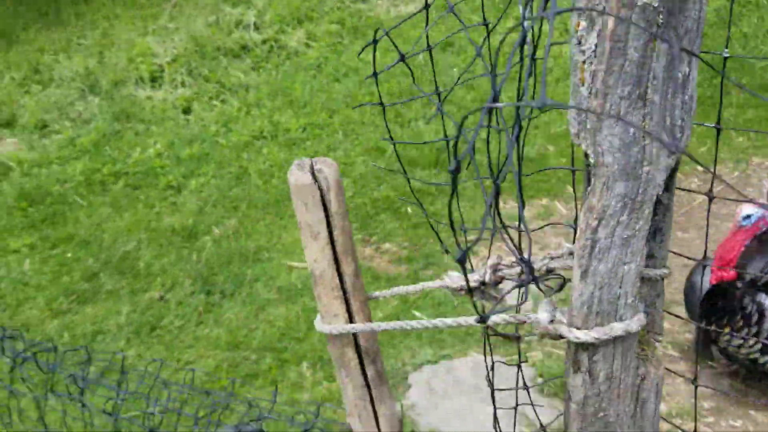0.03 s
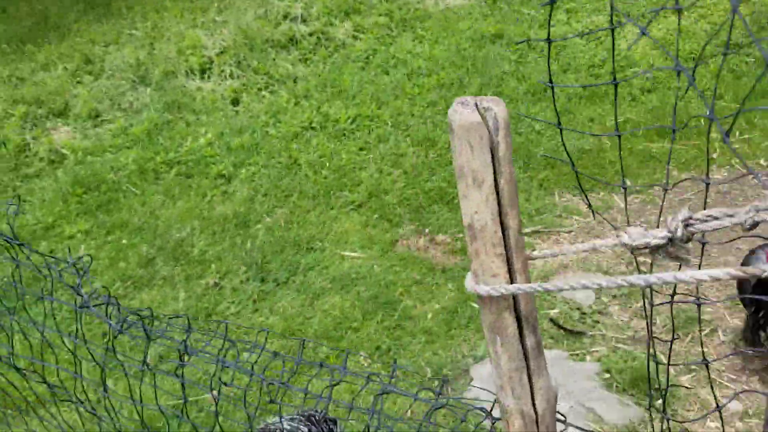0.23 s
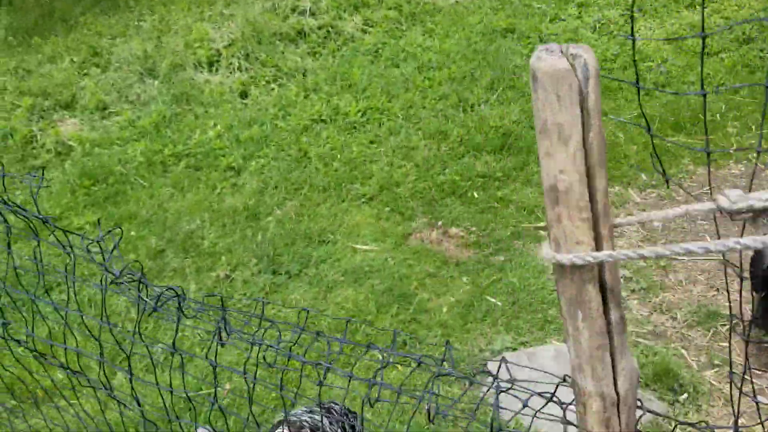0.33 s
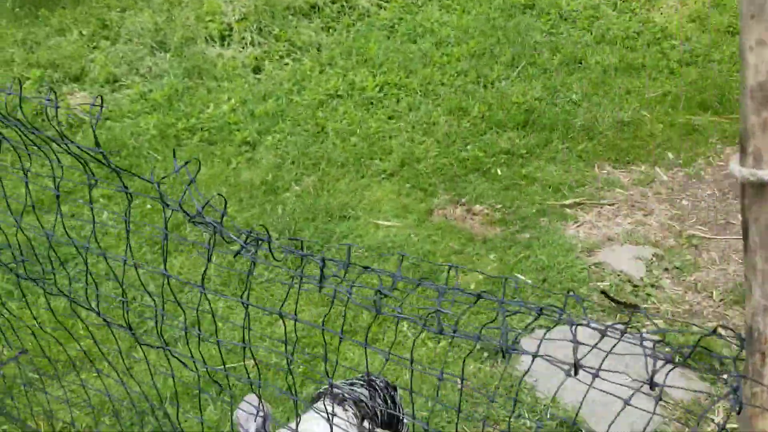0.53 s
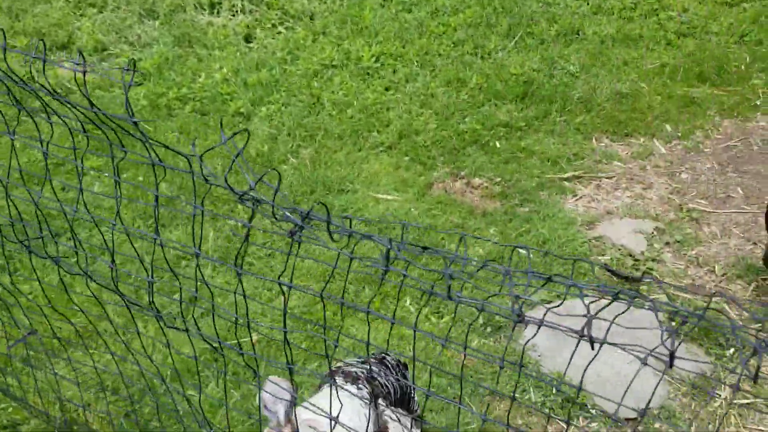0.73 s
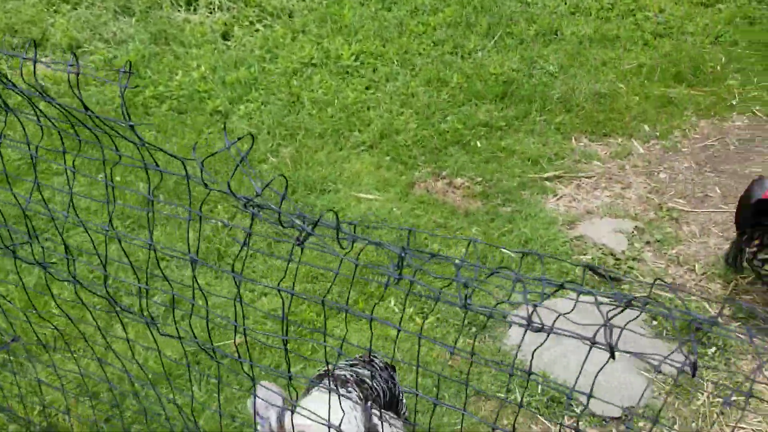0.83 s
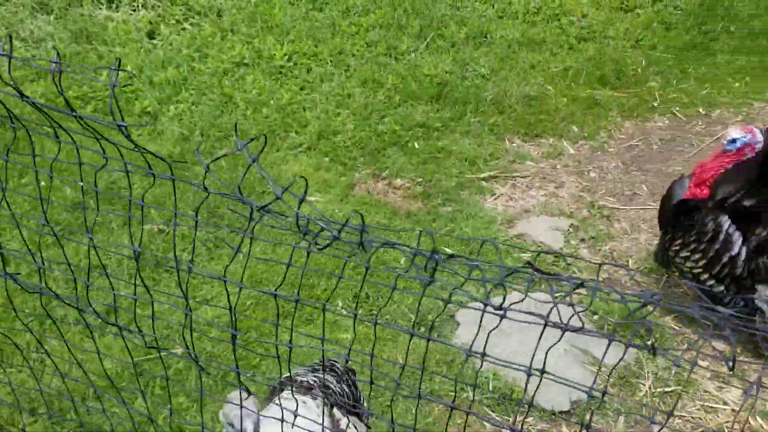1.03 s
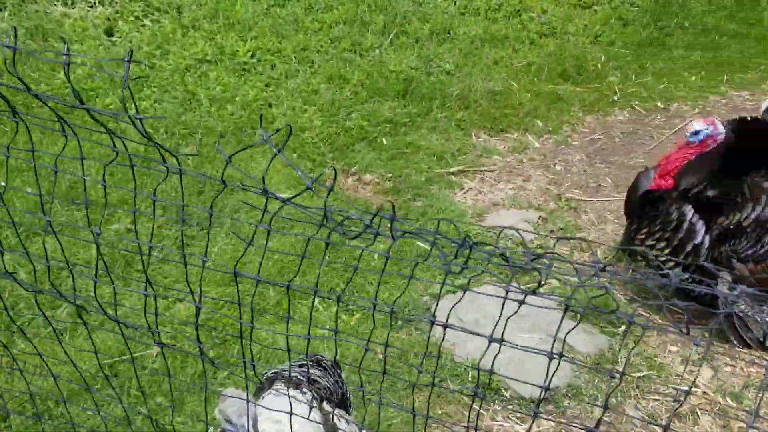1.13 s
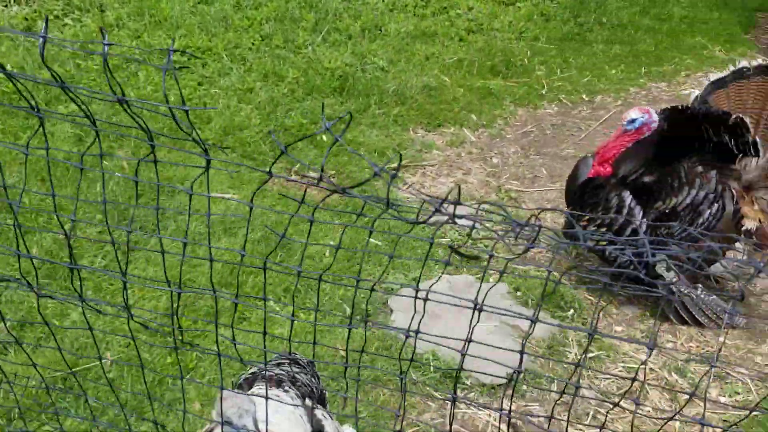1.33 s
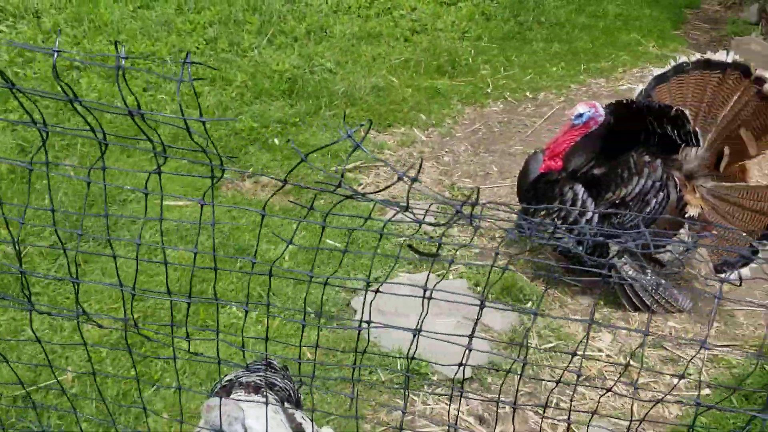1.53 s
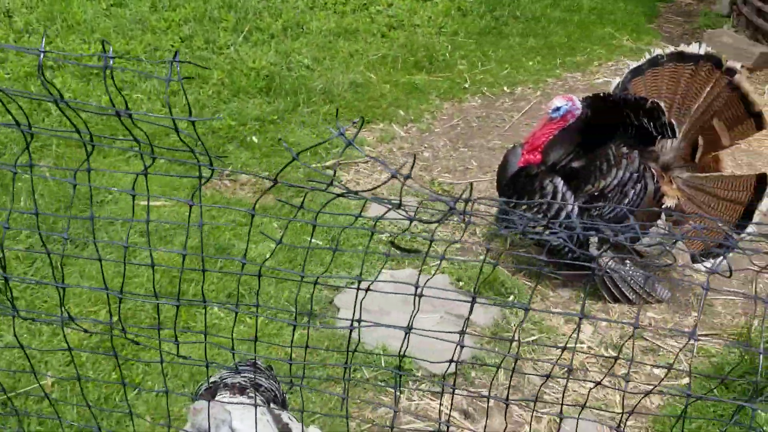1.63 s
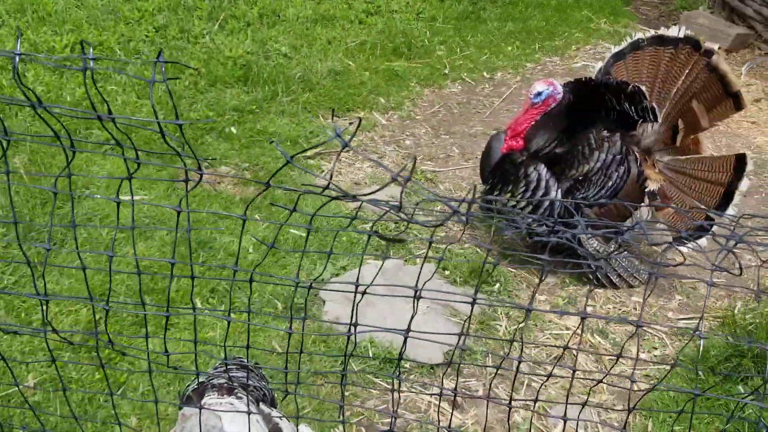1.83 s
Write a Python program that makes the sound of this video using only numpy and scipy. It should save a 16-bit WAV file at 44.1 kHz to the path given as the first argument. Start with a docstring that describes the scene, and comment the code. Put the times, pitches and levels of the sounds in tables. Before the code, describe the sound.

A strutting turkey gives a short spitting puff, then a deep hum, with feathers rustling.

```python
"""In a grass pen, a strutting turkey spits, then drums. The spit is turbulent air sounding the
resonances of throat and beak over a thump of the chest; the drum is a deep, almost pure hum that
ends on a rise. Feathers rustle by friction, straw ticks, and quills knock together late in the drum.
Eddies of light wind bump the two microphone ports. A small bird repeats a faint falling chirp,
and a far tone sounds briefly over the low rumble of the open air."""
import sys
import numpy as np
from scipy import signal
from scipy.fft import rfft, irfft
from scipy.io import wavfile

SR = 44100
rng = np.random.default_rng(int(sys.argv[2]) if len(sys.argv) > 2 else 0)


def materialize(psi):
    """Save the field psi as 16-bit PCM at rate SR to the path in sys.argv[1].

    A 1-D psi becomes a single channel; in a 2-D psi each row is a channel.
    """
    bounded = np.clip(np.atleast_2d(psi).T, -1, 1)
    quanta = np.round(bounded * 32767).astype(np.int16)
    wavfile.write(sys.argv[1], SR, quanta)


N = 83790
T = np.arange(N) / SR
F = np.maximum(np.arange(N // 2 + 1) * SR / N, 1)
PORT_LAG_S = 0.0002587  # the turkey's sound reaches the right port first


def undb(db):
    """Amplitude ratio of a level in decibels."""
    return 10 ** (np.asarray(db) / 20)


def unit(x):
    """Normalisation to an rms of one."""
    return x / np.sqrt(np.mean(x ** 2))


def curve(rows):
    """Linear interpolation of (time [s], value) points."""
    times, values = np.array(rows).T
    return np.interp(T, times, values)


def colour(rows):
    """Interpolation of (frequency [Hz], level [dB]) points on a log-frequency axis."""
    hz, db = np.array(rows).T
    return np.interp(np.log(F), np.log(hz), db)


def resonances(rows):
    """Superposed Lorentzian peaks, as an amplitude spectrum."""
    return sum(undb(db) / (1 + (2 * (F - hz) / width) ** 2) for hz, width, db in rows)


def pan(db):
    """Channel gains for a level difference, left minus right."""
    return undb(np.array([[.5], [-.5]]) * db)


def noise(gain, coherence=0, lag=0):
    """Partly coherent stereo noise of unit rms; the common part reaches the left lag seconds late."""
    share = np.clip(coherence, 0, 1)
    white = rfft(rng.standard_normal((3, N)))
    common = white[2] * np.exp(-2j * np.pi * F * np.array([[lag], [0]]))
    spectrum = np.sqrt(share) * common + np.sqrt(1 - share) * white[:2]
    return unit(irfft(spectrum * gain, N))


def flutter(cutoff_hz):
    """Low-passed noise of unit rms, for random modulation."""
    return unit(irfft(rfft(rng.standard_normal(N)) / (1 + (F / cutoff_hz) ** 4), N))


def envelope(start, attack, hold, decay):
    """Smooth onset, hold and exponential decay, with times in seconds."""
    rise = np.sin(np.pi / 2 * np.clip((T - start) / attack, 0, 1)) ** 2
    return rise * np.exp(-np.maximum(T - start - attack - hold, 0) / decay)


def spit():
    """Source and filter: a spluttering turbulent jet excites the narrow resonances of the beak."""
    # jet spectrum (frequency [Hz], relative level [dB])
    jet_spectrum = [(400, -35), (900, -9), (1300, 0), (2300, 7), (3600, -4.5), (6000, 2.5), (8000, -0.5),
                    (12800, 4), (14200, -0.5)]
    # stereo balance (frequency [Hz], left minus right [dB])
    balance = [(1000, 5), (2400, -5), (4400, 6.5), (7000, 4), (9000, -15.5), (15000, -4.5)]
    # beak resonances (frequency [Hz], width [Hz], boost [dB])
    beak_modes = [(2000, 96, 19), (2750, 240, 8.5), (7730, 130, 4), (10200, 110, 0), (12900, 350, 9)]
    beak_db = sum(db / (1 + (2 * (F - hz) / width) ** 2) for hz, width, db in beak_modes)
    spectrum = undb(colour(jet_spectrum) + beak_db) * pan(colour(balance))
    jet = noise(spectrum, coherence=0.95, lag=PORT_LAG_S)
    splutter = unit(undb(2 * flutter(440)))
    return undb(-35.7) * jet * splutter * envelope(0.2515, attack=0.009, hold=0.027, decay=0.006)


def chuff():
    """Cavity resonance: the first push of air sounds the throat just before the jet."""
    # throat resonances (frequency [Hz], width [Hz], relative level [dB])
    throat_modes = [(340, 360, -4), (720, 110, -3.5), (1090, 380, -9.5)]
    push = envelope(0.23, attack=0.0039, hold=0.024, decay=0.0095)
    return undb(-41) * noise(resonances(throat_modes), coherence=0.91, lag=PORT_LAG_S) * push


def thump():
    """Damped oscillation: the chest swings for a few cycles as the air is pushed out."""
    start_s, chest_hz = .2535, 70
    swing = np.sqrt(2) * np.sin(2 * np.pi * chest_hz * (T - start_s))
    return undb(-26.7) * swing * envelope(start_s, attack=.034, hold=.036, decay=.022)


def drum():
    """Amplitude and frequency modulation: the turkey's deep hum, almost a sine, pulses and rises."""
    # loudness of the hum (time [s], level [dB])
    levels = [(.76, -52.5), (.795, -41), (.89, -52), (.93, -72), (.95, -50), (1.01, -41.5), (1.066, -48),
              (1.122, -36.5), (1.146, -59), (1.163, -37.5), (1.184, -58), (1.205, -43), (1.414, -33),
              (1.486, -34), (1.522, -42.5), (1.545, -34.5), (1.635, -38), (1.665, -43.5), (1.69, -67)]
    # fundamental of the hum (time [s], frequency [Hz])
    pitch = [(.8, 60), (1.13, 64.5), (1.22, 55.64), (1.33, 56), (1.42, 63.3), (1.5, 62.4), (1.56, 72.25)]
    wobble = 1 + 0.031 * flutter(34)
    phase = 2 * np.pi * np.cumsum(curve(pitch) * wobble) / SR
    hum = np.sin(phase) + undb(-27) * np.sin(2 * phase)
    return unit(hum) * undb(curve(levels))


def rustle():
    """Friction noise: feathers rub in grainy swells whose powers add in each of five bands."""
    # feather movements (peak time [s], rise [s], decay [s], level in each band from low to high [dB])
    movements = [(0.238, 0.11, 0.06, -53, -52.5, -55.5, -56.5, -73),
                 (0.327, 0.12, 0.18, -44.5, -52, -51.5, -56.5, -58.5),
                 (0.452, 0.0058, 0.022, -51, -51, -55.5, -89, -80),
                 (0.618, 0.053, 0.049, -49.5, -56, -59, -62.5, -67),
                 (0.839, 0.18, 0.13, -52, -59.5, -60, -62.5, -65),
                 (0.974, 0.038, 0.058, -75, -62.5, -58, -58.5, -65.5),
                 (1.323, 0.034, 0.25, -55, -65.5, -61.5, -71, -61.5),
                 (1.797, 0.049, 0.047, -56.5, -63.5, -56, -71, -62.5),
                 (1.842, .03, .06, -60, -61, -63, -85, -82)]
    # band limits (frequency [Hz])
    edges = [150, 450, 1300, 7000, 12500, 15800]
    # likeness of the two channels in each band (coherence [0-1])
    coherences = [0.99, 0.65, 0.25, 0.59, 0.23]
    # rubbing spectrum, before each band is normalised (frequency [Hz], relative level [dB])
    rub_spectrum = [(300, -3.5), (520, -13.5), (720, -6.5), (1000, -7), (1300, -15), (1600, -11.5),
                    (2050, -11.5), (3200, -17), (5000, -24.5), (8500, -32.5), (12600, -30.5),
                    (15800, -39.5)]
    # stereo balance (frequency [Hz], left minus right [dB])
    balance = [(1000, 0.5), (2400, -1.5), (4400, 5), (7000, 8.5), (9000, -18), (15000, -8)]
    spectrum = undb(colour(rub_spectrum)) * pan(colour(balance))
    grain = unit(undb(2 * flutter(410)))
    out = 0
    for k, coherence in enumerate(coherences):
        band = 1 / (1 + (edges[k] / F) ** 10) / (1 + (F / edges[k + 1]) ** 10)
        power = 0
        for peak, rise, decay, *band_db in movements:
            swell = np.exp(-np.maximum((peak - T) / rise, (T - peak) / decay))
            power += (undb(band_db[k]) * swell) ** 2
        out += noise(spectrum * np.sqrt(band), coherence, PORT_LAG_S) * np.sqrt(power)
    return out * grain


def quills():
    """Impact excitation: shivering quills knock together, each time with the same short ring."""
    # knocks (time [s], level [dB])
    impacts = [(1.49, -51), (1.559, -55), (1.576, -55), (1.587, -50.5), (1.598, -47), (1.607, -54),
               (1.62, -51.5)]
    # quill resonances (frequency [Hz], width [Hz], relative level [dB])
    quill_modes = [(3350, 900, 0), (4900, 1800, -12)]
    knocks = sum(undb(db) * envelope(start, attack=.0008, hold=0, decay=.0024) for start, db in impacts)
    return noise(resonances(quill_modes), coherence=0.2) * knocks * pan(2)


def straw_ticks():
    """Heavy damping: each snap of straw is a burst in one broad resonance that dies quickly."""
    # snaps (time [s], level [dB], centre frequency [Hz], decay [s], left minus right [dB])
    snaps = [(0.538, -50, 9100, 0.0027, -12), (0.825, -56, 4970, 0.013, 0), (.908, -55.5, 2560, 0.017, 2),
             (1.095, -49.5, 1130, 0.0019, 0), (1.121, -52.5, 1410, 0.0018, -10),
             (1.461, -57, 4300, 0.0065, 6)]
    relative_bandwidth = 0.44
    out = 0
    for start, db, hz, decay, side_db in snaps:
        resonance = 1 / np.hypot(1, (F / hz - hz / F) / relative_bandwidth)
        burst = envelope(start, attack=0.00067, hold=0, decay=decay)
        out += noise(resonance) * burst * undb(db) * pan(side_db)
    return out


def wind_buffets():
    """Turbulent pressure: each eddy gives deep swings and a rumble, stronger at one microphone port."""
    # eddies (peak time [s], rise [s], decay [s], level of the swing [dB], left minus right [dB])
    eddies = [(0.334, 0.022, 0.021, -25.5, -1.5), (0.398, 0.02, 0.029, -33, -34),
              (0.86, 0.0276, 0.044, -32.5, -14.5)]
    # rumble spectrum (frequency [Hz], relative level [dB])
    rumble_spectrum = [(20, -22), (62, -0.5), (110, -10.5), (300, -30), (900, -78)]
    swing_hz = 68.4
    out = 0
    for peak, rise, decay, db, side_db in eddies:
        swing = np.sqrt(2) * np.cos(2 * np.pi * swing_hz * (T - peak))
        rumble = undb(-0.5) * noise(undb(colour(rumble_spectrum)))
        bump = envelope(peak - rise, rise, 0, decay)
        out += (swing + rumble) * bump * undb(db) * unit(pan(side_db))
    return out


def whistle(start, db, length, start_hz, target_hz):
    """Exponential glide: a bird's wavering note slides fast, then levels off towards a target pitch."""
    glide_s, waver = 0.011, .028
    age = np.clip(T - start, 0, length)
    glide = target_hz + (start_hz - target_hz) * np.exp(-age / glide_s)
    hz = glide * (1 + waver * flutter(221))
    swell = np.sin(np.pi * age / length) ** 2
    return undb(db) * swell * np.sin(2 * np.pi * np.cumsum(hz) / SR)


def small_bird():
    """Scattering adds a short echo to a bird's up-and-down chirps, about nine a second."""
    # falling notes (time [s], level [dB], frequency at which the fall levels off [Hz])
    falls = [(0.822, -65.5, 3950), (0.926, -65.5, 3750), (1.031, -62.5, 3600), (1.139, -64.5, 3950),
             (1.247, -65, 3950), (1.362, -65, 4000)]
    upnote_lead_s, echo_decay_s = 0.027, .02
    song = 0
    for start, db, target_hz in falls:
        song += whistle(start - upnote_lead_s, db - 8, length=0.02, start_hz=5870, target_hz=9070)
        song += whistle(start, db, length=.044, start_hz=7810, target_hz=target_hz)
    scatter = unit(rng.standard_normal((2, N)) * np.exp(-T / echo_decay_s)) / np.sqrt(N)
    echo = irfft(rfft(song) * rfft(scatter), N)
    return (song + undb(-2) * echo) * pan(10)


def far_tone():
    """Narrow-band noise is heard as a faint, blurred tone in the distance."""
    centre_hz, width_hz = 1560, 170
    tone = noise(resonances([(centre_hz, width_hz, 0)]))
    return undb(-64.5) * tone * envelope(1.25, attack=0.033, hold=0.076, decay=0.16)


def air():
    """Coherence falls with frequency: the outdoor rumble is alike on both sides, the faint hiss is not."""
    # ambient spectrum (frequency [Hz], relative level [dB])
    ambient_spectrum = [(20, -2), (50, 0), (85, 3.5), (150, -11), (500, -26), (1200, -31), (2000, -22),
                        (2700, -33), (4500, -31), (9000, -38.5), (13000, -33)]
    corner_hz = 756
    coherence = 0.69 / (1 + (F / corner_hz) ** 2)
    return undb(-51) * noise(undb(colour(ambient_spectrum)), coherence)


def scene():
    """Superposition of the nearby turkey and its open-air surroundings."""
    display = chuff() + spit() + thump() + drum()
    nearby = wind_buffets() + rustle() + straw_ticks() + quills()
    background = small_bird() + far_tone() + air()
    return display + nearby + background


def record(dry):
    """Band limiting: a steep low-pass filter removes the highest treble."""
    cutoff_hz = 15600
    return signal.sosfilt(signal.ellip(10, .2, 80, cutoff_hz, fs=SR, output="sos"), dry)


dry = scene()
out = record(dry)
materialize(out)
```